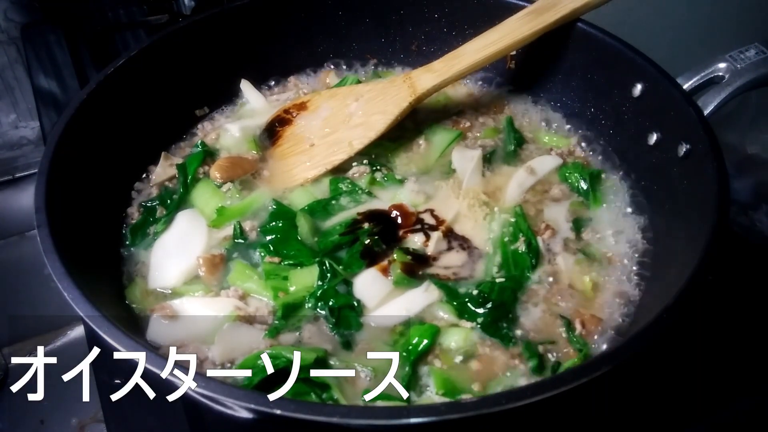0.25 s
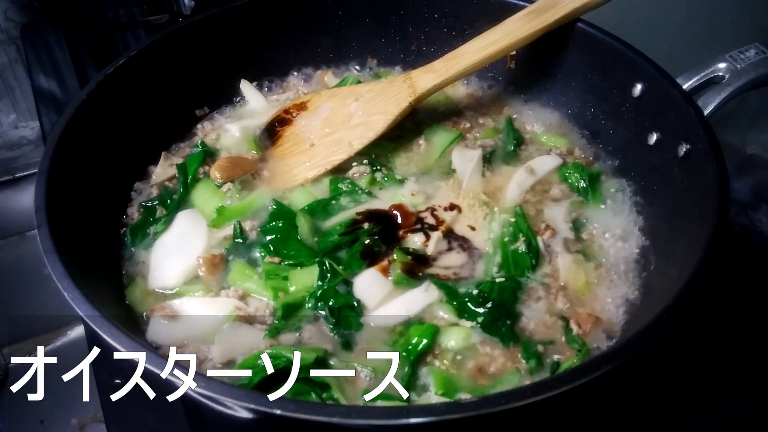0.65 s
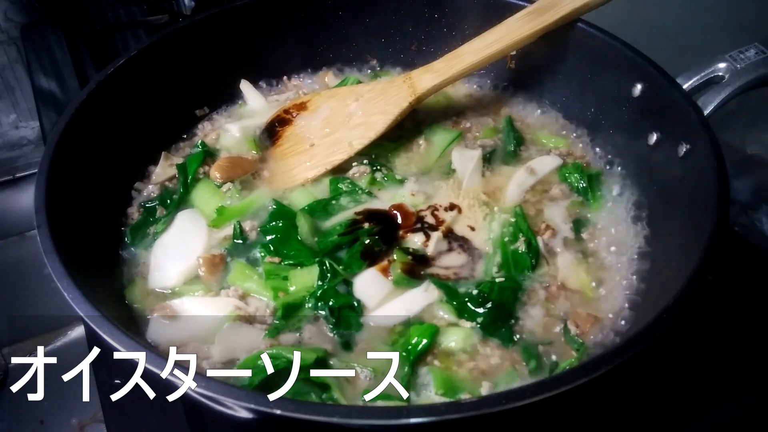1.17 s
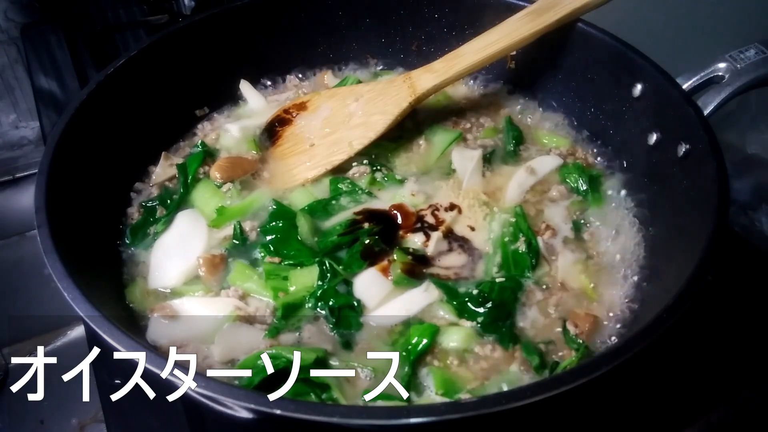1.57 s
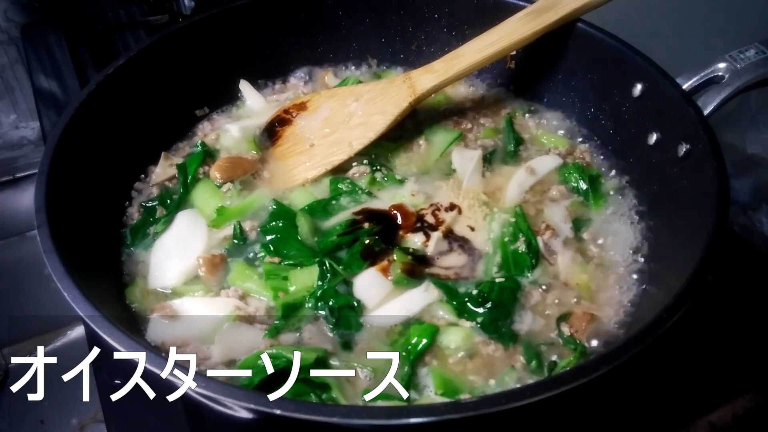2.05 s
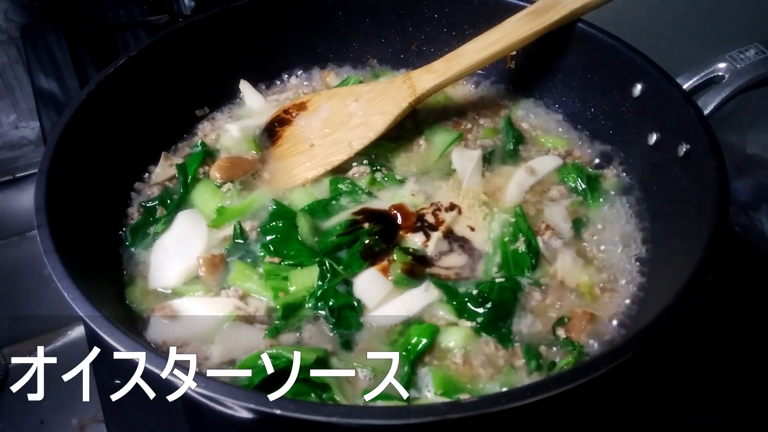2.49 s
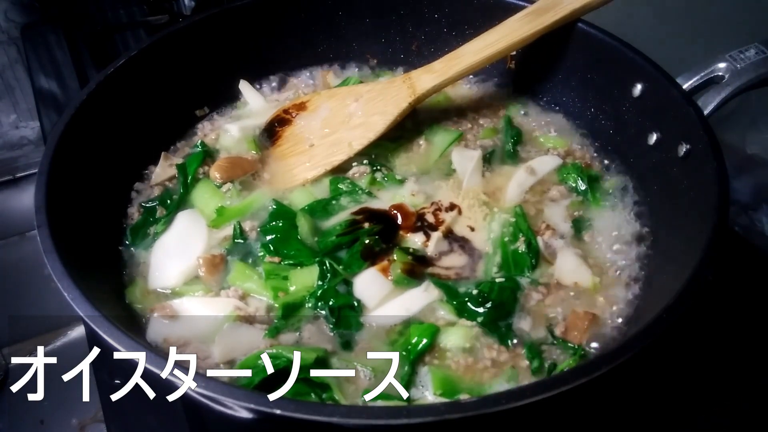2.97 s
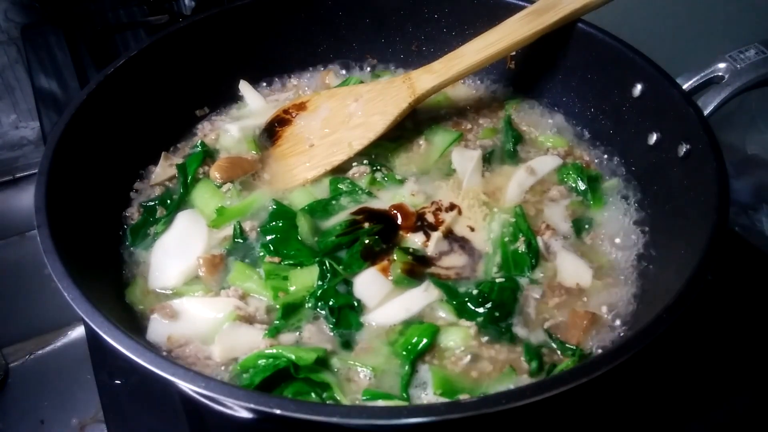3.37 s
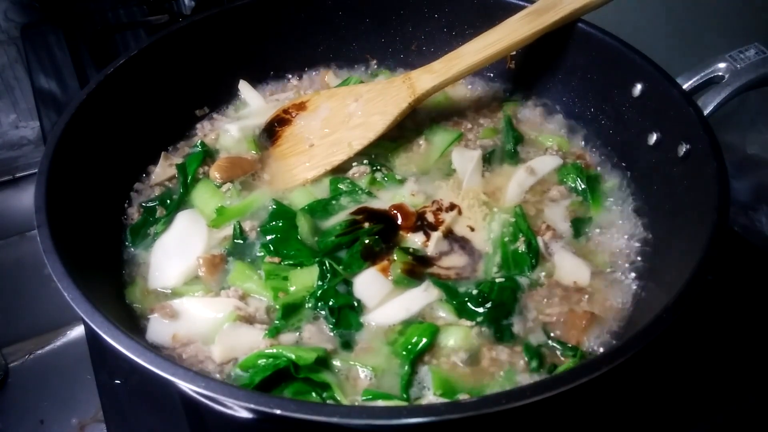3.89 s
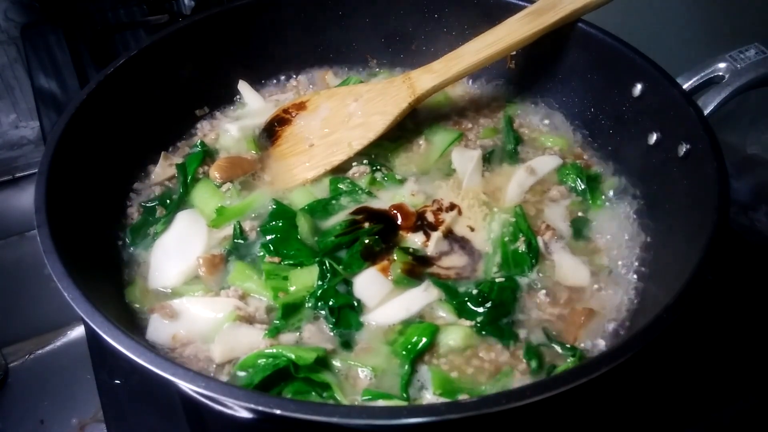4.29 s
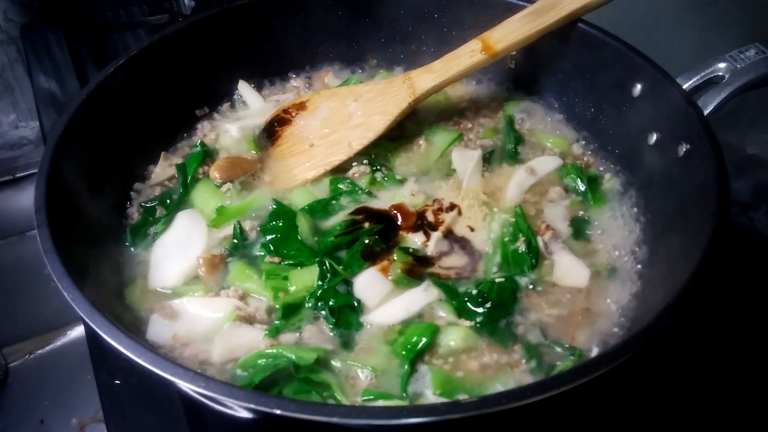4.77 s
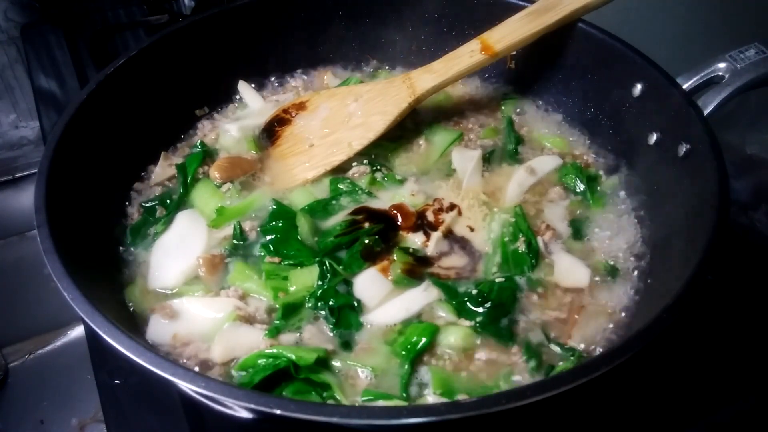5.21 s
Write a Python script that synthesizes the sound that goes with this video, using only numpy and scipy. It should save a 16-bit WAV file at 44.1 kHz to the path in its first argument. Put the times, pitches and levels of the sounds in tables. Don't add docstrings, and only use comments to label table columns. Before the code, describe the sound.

Broth sizzles and bubbles softly in a pan close by while a wooden drawer is knocked, slid and shut, with sharp clicks on a counter.

```python
import sys
import numpy as np
from scipy import signal
from scipy.fft import rfft, irfft, next_fast_len
from scipy.io import wavfile
from scipy.ndimage import uniform_filter1d, minimum_filter1d, map_coordinates

SR = 44100
rng = np.random.default_rng(int(sys.argv[2]) if len(sys.argv) > 2 else 0)


def field_ratio(decibels):
    return 10 ** (np.asarray(decibels, dtype=float) / 20)


def unload_wav(signal):
    wavfile.write(
        sys.argv[1],
        SR,
        np.round(np.clip(np.atleast_2d(signal).T, -1, 1) * 32767).astype(np.int16),
    )


N = 239992


def unit(x):
    return x / np.sqrt(np.mean(x ** 2) + 1e-20)


def seconds(length):
    return np.arange(length) / SR


def along(points, hz):
    f, v = np.transpose(points)
    return np.interp(np.log(hz + 1), np.log(f + 1), v)


def curve(rows):
    s, level_db = np.transpose(rows)
    return np.interp(seconds(N), s, level_db)


def wobble(rate):
    knots = rng.standard_normal(int(N * rate / SR) + 4)
    return map_coordinates(knots, [np.arange(N) * rate / SR])


def filtered(x, response):
    m = next_fast_len(len(x) + 8192)
    spectrum = rfft(x, m) * response(np.fft.rfftfreq(m, 1 / SR))
    return unit(irfft(spectrum, m)[:len(x)])


def resonances(modes):
    def response(f):
        total = 0
        for k, (hz, width, db) in enumerate(modes):
            total = total + (-1) ** k * field_ratio(db) * 1j * f * width / (hz * hz - f * f + 1j * f * width)
        return total
    return response


def patchy(depth_db, size):
    z = signal.stft(rng.standard_normal(N + 512), nperseg=512)[2]
    field = uniform_filter1d(rng.standard_normal(z.shape), size, 0)
    field = uniform_filter1d(field, 8, 1)
    patched = z * field_ratio(depth_db * np.clip(unit(field), -2, 2))
    return signal.istft(patched, nperseg=512)[1][:N]


def steadied(x):
    return unit(x / (np.abs(signal.hilbert(x)) + 0.16) ** .5)


def add(out, s, x):
    part = out[round(s * SR):][:len(x)]
    part += x[:len(part)]


def tones(lines, drift):
    t, out = seconds(N), np.zeros(N)
    for hz, db in lines:
        level = field_ratio(db + 3.5 + 1.4 * wobble(9))
        out += level * np.sin(2 * np.pi * hz * t + drift * wobble(4.45))
    return out


# start_s, level_db
DRAUGHT = [(0.0, -43.5), (.13, -43.5), (.4, -45.5), (.7, -45), (.95, -45.5), (1.21, -43.5), (1.54, -50.5),
           (1.86, -50.5), (2.4, -44), (2.6, -52.5), (3.0, -49), (3.45, -48), (3.75, -50), (4.1, -48),
           (4.3, -50.5), (4.65, -49), (5.15, -52.5), (5.44, -48.5)]


def flame(db, grows):
    return db + grows * (curve(DRAUGHT) + 50)


# pitch_hz, level_db
MOTOR_NOTES = [(64, 2.5), (131, -13)]
# start_s, level_db
MOTOR_LOAD = [(0.0, -41.5), (.14, -58), (0.39, -41.5), (0.58, -40), (.85, -48), (1.14, -44), (1.45, -54),
              (1.9, -70), (3.04, -51), (3.56, -52.5), (3.77, -45), (4.15, -48), (4.55, -55.5), (4.8, -48),
              (4.91, -38), (5.05, -36.5), (5.28, -39.5), (5.34, -45)]


def far_motor():
    return field_ratio(curve(MOTOR_LOAD) - 2.0) * tones(MOTOR_NOTES, drift=1.3)


# pitch_hz, level_db
HUM_NOTES = [(99, 4.5), (195, -6)]
# pitch_hz, level_db
WHINE_NOTES = [(486.3, -63), (195, -62)]
# start_s, length_s, level_db
HUM_SPELLS = [
    (0, 0.14, -44.5),
    (0.882, 0.35, -44.5),
    (2.076, 0.33, -44),
    (2.84, 0.11, -50),
    (3.207, 0.18, -50.5),
    (3.5, .12, -50),
    (4.1, 0.22, -54),
    (4.615, 0.06, -48.5),
    (4.9, 0.45, -50),
]
HUM_FADE_DB_PER_S, HUM_IDLE_DB = 82, -55.5


def appliances():
    t = seconds(N)
    hum_db = np.full(N, HUM_IDLE_DB)
    for s, length, db in HUM_SPELLS:
        outside_s = np.maximum(np.maximum(s - t, t - s - length), 0)
        hum_db = np.maximum(hum_db, db - HUM_FADE_DB_PER_S * outside_s)
    return field_ratio(hum_db - 4.5) * tones(HUM_NOTES, drift=0.97) + tones(WHINE_NOTES, drift=0.38)


# pitch_hz, level_db
RUMBLE_COLOUR = [(12, -39), (20, 4), (43, -3), (70, -1.5), (172, -6.5), (278, -4.5), (445, -25),
                 (492, -14.5), (535, -42), (600, -9.5), (780, -37), (1320, -120)]
# pitch_hz, width_hz, level_db
ROOM_MODES = [(47, 7.9, -0.5), (139, 22, 1.5), (264.5, 45, -1), (278, 6.8, -5.5), (346.8, 10, 7.5),
              (393.4, 26.5, 11)]


def rumble():
    def room(f):
        return field_ratio(along(RUMBLE_COLOUR, f)) * (1 + 2.36 * np.abs(resonances(ROOM_MODES)(f)))
    level = field_ratio(flame(-48, grows=1.04) + 1.5 * wobble(10))
    return level * filtered(patchy(1.8, size=2), room)


# start_s, level_db, hold_s (ringing on), boom_db, rattle_db
DRAWER_BLOWS = [(1.9713, -10, 0.0084, -1.5, -8.5), (1.997, -21, 0.036, 4, -6),
                (2.098, -19, 0.03, -3, -10.5), (2.15, -21.5, 0.13, -2.5, -15), (2.33, -52.5, 0.11, -9, -4),
                (2.489, -41.5, 0.015, -12, -8.5), (2.759, -17.5, 0.0089, -8, -9),
                (2.797, -28.5, 0.033, 0, -14.5), (3.04, -42, 0.0044, -3, -5),
                (3.221, -40, 0.015, -11, -5.5), (3.296, -37, 0.016, -23, -33),
                (4.055, -38, 0.024, -9.5, -26), (4.6, -49, 0.018, -11, -5)]
# pitch_hz, width_hz, level_db
FRONT_PANEL = [(179, 29, -8), (235.6, 68, -3), (318.4, 42, 1.5), (387, 87, -6.5), (466, 85, -7),
               (560, 67, -16)]
# pitch_hz, width_hz, level_db
CABINET = [(53, 23, -4.5), (93, 14, -8), (142, 7.5, 0.5)]
# pitch_hz, width_hz, level_db
RUNNERS = [(644, 74, 8.5), (940, 210, 6), (1174, 330, 2), (1500, 120, 1), (1890, 175, -6),
           (2900, 2700, -20)]
WOOD_T60_S, T60_PER_HOLD, LONGEST_T60_S = 0.12, 9.7, 0.22


def drawer():
    out, t = np.zeros(N), seconds(SR // 2)

    def panel(f):
        return resonances(FRONT_PANEL)(f) / (1 + 1j * f / 600) ** 2

    def cabinet(f):
        return resonances(CABINET)(f) / (1 + 1j * f / 250) ** 2

    for s, db, hold, boom_db, rattle_db in DRAWER_BLOWS:
        t60 = min(WOOD_T60_S + T60_PER_HOLD * hold, LONGEST_T60_S)
        fall_db = -60 * np.maximum(t - hold, 0) / t60
        shake = rng.standard_normal((3, len(t)))
        wood = steadied(filtered(shake[0], panel))
        wood += field_ratio(boom_db) * filtered(shake[1], cabinet)
        wood += field_ratio(rattle_db + 0.5 * fall_db) * filtered(shake[2], resonances(RUNNERS))
        add(out, s, field_ratio(db + fall_db) * (1 - np.exp(-t / 0.00062)) * wood)
    return out


# start_s, peak_db, first_hz, last_hz, length_s
SLACKENING = [
    (1.972, -9, 351, 214, 0.042),
    (2.761, -12.5, 482, 130, 0.017),
    (2.773, -17, 320, 290, 0.0243),
]
# start_s, peak_db, first_hz, last_hz, length_s
CHOKED_GLIDES = [(2.7635, -9.5, 57, 132, .05), (3.333, -33, 250, 215, .025), (2.102, -12.5, 385, 317, 0.035),
                 (2.15, -13, 326, 301, .034), (2.186, -13.5, 295, 320, 0.039), (2.265, -16.5, 334, 317, 0.041),
                 (2.012, -18, 254, 213, 0.017), (2.03, -15.5, 175, 120, .025), (2.05, -14.5, 62, 75, 0.0253),
                 (2.072, -16, 110, 150, .016), (2.238, -19, 418, 288, .025), (4.056, -31.5, 330, 270, 0.019),
                 (4.083, -33.5, 260, 240, 0.021)]


def gliding_panels():
    out, t = np.zeros(N), seconds(SR // 10)
    glides = [(*row, 5.5) for row in SLACKENING] + [(*row, 2) for row in CHOKED_GLIDES]
    for s, db, first_hz, last_hz, length, fade_db in glides:
        hz = first_hz * (last_hz / first_hz) ** np.minimum(t / length, 1)
        shape = field_ratio(db - fade_db * t / length) * (1 - np.exp(-t / 0.00097))
        shape *= np.exp(-np.maximum(t - length, 0) / 0.0037)
        add(out, s, shape * np.sin(2 * np.pi * np.cumsum(hz) / SR))
    return out


# start_s, peak_db
ROLLER_TICKS = [(2.097, -22.5), (2.1143, -20), (2.1183, -22), (2.1513, -17), (2.1745, -23), (2.193, -28),
                (2.252, -33)]
# start_s, peak_db, pitch_hz, held_cycles
RINGING_KNOCKS = [(1.2908, -19, 640, 0.7), (1.2893, -33.5, 258, 1.8), (1.2915, -29, 2340, 3.4),
                  (4.13, -44, 2260, 10), (3.968, -43, 2450, 14), (3.987, -45.5, 1720, 13),
                  (1.9705, -19.5, 1880, 6.7), (1.99, -19, 300, 3.7), (1.988, -14.5, 215, 5.3),
                  (2.103, -24, 483, 7.4), (2.165, -25, 459, 15.6), (2.02, -22, 473, 7.2),
                  (1.995, -22, 400, 5), (2.8, -24, 445, 3), (2.0, -22, 940, 3), (2.758, -25.5, 964, 3.6),
                  (2.015, -22, 107.4, 1.5), (2.21, -30, 1030, 6), (2.245, -31, 700, 13.8),
                  (2.29, -35, 930, 6), (2.08, -30, 700, 6.8), (2.115, -28, 815, 6), (2.768, -24, 190, 2),
                  (2.757, -21, 300, 2), (2.882, -34, 230, 1.2), (1.298, -32, 650, 3), (3.583, -33, 1750, 8),
                  (3.588, -31, 750, 5), (2.942, -30.5, 150, .8), (4.776, -34, 123, .9),
                  (2.862, -22, 145, 0.88), (3.5215, -29, 910, 1.9), (3.5525, -17, 850, 0.85),
                  (3.556, -10.5, 900, .8), (3.568, -25, 870, 0.99)]
# start_s, peak_db, pitch_hz, held_cycles
CABINET_SWINGS = [(2.028, -21, 46, 1.6), (2.114, -27, 66, 3.1), (2.134, -21, 140.5, 3.5),
                  (2.221, -22, 91.4, 5.6), (2.31, -30, 319.7, 7.9), (2.82, -24, 110, 1.6),
                  (2.836, -26, 206, 2.7), (2.868, -35, 305, 6.6), (2.901, -27, 155, 1.3),
                  (2.158, -17, 182, 7.4), (2.14, -15, 232.5, 3.5)]


def struck_bodies():
    out, t = np.zeros(N), seconds(SR // 3)
    bodies = [(*row, 5.9) for row in RINGING_KNOCKS] + [(*row, 4.6) for row in CABINET_SWINGS]
    bodies += [(s, db - 13.5, 1890, 6.5, 8) for s, db in ROLLER_TICKS]
    for s, db, hz, cycles, ring in bodies:
        hold = cycles / hz
        swing = field_ratio(db - 60 * np.maximum(t - hold, 0) / (ring * hold)) * (1 - np.exp(-t * hz / 0.072))
        add(out, s, swing * np.sin(2 * np.pi * hz * t))
    return out


# start_s, level_db,
# pitch_hz, length_s
BRUSHES = [(1.944, -52, 2400, .022), (2.0, -46, 7850, 0.092), (1.999, -41.5, 1280, 0.083),
           (2.033, -44.5, 10500, 0.079), (2.485, -57, 3330, .035), (3.114, -51.5, 3230, .04),
           (3.114, -66, 4670, 0.036), (3.212, -58, 3320, .05), (3.575, -46, 1130, 0.067),
           (3.966, -46.5, 2500, .022), (3.969, -53, 4940, 0.04), (3.979, -49.5, 3280, .03),
           (3.964, -49.5, 950, 0.035), (3.965, -52.5, 1680, .03), (4.03, -57, 3300, .05),
           (4.06, -58, 2130, .1), (4.14, -59, 3300, .02), (4.125, -56, 2350, .02), (4.05, -62, 5000, .1),
           (4.058, -51, 800, 0.097)]


def scuffs():
    out, t = np.zeros(N), seconds(SR // 5)
    for s, db, hz, length in BRUSHES:
        band = resonances([(hz, .35 * hz, 0)])
        rub = filtered(rng.standard_normal(len(t)), lambda f: band(f) ** 2)
        shape = field_ratio(db - 60 * np.maximum(t - length, 0) / 0.14) * (1 - np.exp(-t / 0.0014))
        add(out, s, shape * rub)
    return out


# pitch_hz, t60_s
KITCHEN_T60 = [(300, 0.87), (1000, 0.13), (4000, 0.29), (9000, 0.2), (15000, 0.14)]


def echo(response, length):
    hz, t, z = signal.stft(rng.standard_normal(SR // 2), SR, nperseg=256)
    fade = field_ratio(-60 * t / along(KITCHEN_T60, hz)[:, None])
    fade = fade * (1 - np.exp(-t / (0.0025 + 0.14 * length)))
    tail = filtered(signal.istft(z * fade, SR, nperseg=256)[1], response)
    return tail / np.linalg.norm(tail)


# start_s, peak_db, t60_s, knock_hz, knock_db
COUNTER_CLICKS = [(1.2346, -30.5, 0.023, 9000, 0), (1.245, -29, 0.014, 3580, -0.5),
                  (1.255, -39, 0.012, 3000, -25), (1.2907, -49, 0.032, 694, 23.5),
                  (1.2912, -5, 0.0045, 2620, -20), (2.001, -21.5, 0.052, 2500, 0.5),
                  (2.7552, -15, 0.005, 10200, -5), (3.412, -25.5, 0.052, 5230, 0.5),
                  (3.4151, -20.5, 0.03, 860, -5.5), (3.4185, -18.5, 0.018, 7700, -5),
                  (3.424, -25, 0.015, 3000, -6), (3.458, -32, 0.038, 5000, 4.5),
                  (3.4605, -17, 0.011, 800, -9), (3.522, -49, 0.013, 1100, 23),
                  (3.5523, -7, 0.0051, 6260, -0.5), (3.556, -18, 0.0071, 9500, -7),
                  (3.563, -19, 0.008, 6000, -1), (3.569, -24, 0.008, 6500, -3),
                  (3.5532, -24, 0.02, 2720, 4), (3.5547, -33.5, 0.046, 900, 16.5),
                  (3.995, -23, 0.0096, 1700, -24)]
# start_s, peak_db, t60_s, knock_hz, knock_db
CABINET_CATCHES = [
    (0.566, -50.5, 0.045, 1600, 13.5),
    (1.9699, -6.5, 0.016, 1890, -16),
    (2.7598, -15, 0.008, 1280, -11),
    (3.105, -47, 0.085, 1740, 2),
    (3.115, -30, 0.13, 800, -8),
    (1.496, -56, 0.031, 1050, 20),
    (1.818, -58, 0.04, 1150, 20),
    (2.026, -20.5, 0.038, 2600, -3.5),
    (4.13, -64, 0.04, 2400, 22),
]
# pitch_hz, width_hz, level_db
MIC_PORT = [(2500, 1200, -9.5), (5520, 1030, -9.5), (7370, 640, 2.5), (10360, 1070, 1.5), (15100, 760, -9)]


def clicks():
    out, t = np.zeros(N), seconds(SR // 5)
    ticks = [(s, db, 0.0087, 2620, -6.5) for s, db in ROLLER_TICKS]
    contacts = [(*row, -1) for row in COUNTER_CLICKS]
    contacts += [(*row, -7) for row in CABINET_CATCHES + ticks]
    crack = resonances(MIC_PORT)
    for s, db, t60, hz, knock_db, room_db in contacts:
        body = resonances([(hz, hz / 1.24, 0)])
        knock = lambda f: body(f) ** 2
        shape = field_ratio(-60 * t / t60) * (1 - np.exp(-t / (0.092 * t60)))
        grit = shape * rng.standard_normal((2, len(t)))
        size = field_ratio(db) * np.sqrt(np.mean(shape ** 2))
        direct = filtered(grit[0], crack) + field_ratio(knock_db) * filtered(grit[1], knock)
        answer = echo(crack, t60) + field_ratio(knock_db) * echo(knock, t60)
        add(out, s, size * direct)
        add(out, s, size * field_ratio(room_db) * np.sqrt(len(t)) * answer)
    return out


# pitch_hz, level_db
BROTH_COLOUR = [(240, -11), (400, -5), (521, -4), (922, -4.5), (1500, -12), (1720, -7.5), (1990, -11),
                (2520, -13), (5000, -27.5), (6500, -50), (11000, -120)]
# pitch_hz, width_hz, level_db
PAN_MODES = [(800, 12, -1.5), (926, 15, 4.5), (1216, 31, 0.5), (1600, 9.2, 8.5), (1757, 28, -1),
             (2500, 130, -1)]


def bubbles(count=2500):
    when = rng.random(count)
    hz = np.clip(1100 * np.exp(.6 * rng.standard_normal(count)), 300, 5000)[:, None]
    size = field_ratio(2.0 * rng.standard_normal(count))[:, None]
    cycles = seconds(900) * hz
    life = cycles / 6.5
    shapes = size * life * np.exp(-2.5 * life) * np.sin(2 * np.pi * cycles * (1 + 0.057 * life))
    index = (when * N).astype(int)[:, None] + np.arange(900)
    pops = np.bincount(index.ravel(), shapes.ravel(), N + 900)[:N]

    def pan(f):
        return field_ratio(along(BROTH_COLOUR, f)) * (1 + 0.64 * np.abs(resonances(PAN_MODES)(f)))

    wash = filtered(patchy(2.94, size=4), pan)
    level = field_ratio(flame(-52, grows=0.72) - 0.5 + 0.8 * wobble(12))
    return level * unit(wash + 0.78 * filtered(pops, pan))


# start_s, peak_db, pitch_hz
BIG_BUBBLES = [(0.209, -40, 906), (0.238, -38, 705), (0.349, -35, 800), (0.381, -31, 278),
               (0.574, -38, 1010), (0.619, -34, 926), (0.699, -38, 908), (0.941, -36, 924),
               (0.999, -37, 1780), (2.414, -48, 1020), (2.726, -40, 954), (3.04, -53, 1010),
               (3.12, -38, 824), (3.352, -40, 606), (3.749, -37, 1600), (4.0667, -37, 2000),
               (4.134, -37, 2130), (4.1969, -41, 2090), (4.423, -38.5, 790), (4.475, -34, 870),
               (4.496, -38, 1570), (4.819, -41, 1600), (4.889, -41, 640), (4.968, -36.5, 420),
               (5.098, -34, 252), (5.226, -36.5, 269), (5.307, -37, 960)]


def plops():
    out, t = np.zeros(N), seconds(SR // 12)
    for s, db, hz in BIG_BUBBLES:
        life = t * hz / 9
        shape = field_ratio(db + 1.5) * np.sqrt(life) * np.exp(-1.5 * life)
        add(out, s, shape * np.sin(2 * np.pi * hz * t * (1 + 0.015 * life)))
    return out


# start_s, peak_db
MORE_DROPS = [(0.5437, -25), (1.0191, -33), (1.1107, -30), (1.6092, -33), (1.7674, -36), (2.3082, -36),
              (2.4369, -31), (2.5686, -35), (2.819, -34), (3.2176, -29), (3.8561, -28), (4.3585, -34),
              (4.8444, -28)]


def more_drops():
    out, t = np.zeros(N), seconds(SR // 30)
    for s, db in MORE_DROPS:
        snap = filtered(rng.standard_normal(len(t)), resonances(MIC_PORT))
        add(out, s, field_ratio(db - 10 - 60 * t / .012) * snap)
    return out


# start_s, peak_db, pitch_hz
EARLY_CRACKS = [(0.1376, -33, 7320), (0.3102, -33, 7370), (0.3601, -30, 7340), (0.5162, -31, 7600),
                (0.6873, -32, 10400), (0.7796, -32, 7450), (0.838, -27, 10400), (1.0191, -31, 7690),
                (1.1104, -29, 10600), (1.1588, -32, 9210), (1.1643, -29, 7440), (1.2346, -26, 7430)]
# start_s, peak_db, pitch_hz
MIDWAY_CRACKS = [(1.547, -31, 10200), (1.767, -30, 10200), (1.8368, -33, 7740)]
# start_s, peak_db, pitch_hz
LATE_CRACKS = [(4.3585, -32, 9800), (4.37, -35, 10500), (4.3734, -32, 9720), (4.3864, -36, 10300),
               (4.3944, -35, 9730), (4.4294, -36, 9850), (4.4554, -32, 9240), (4.4664, -32, 10200),
               (4.4974, -35, 10400), (4.5087, -31, 10500), (4.5204, -33, 10400), (4.5774, -37, 10800),
               (4.6019, -34, 7490), (4.6723, -33, 10500), (4.7162, -28, 10600), (4.7734, -33, 10900),
               (4.8184, -34, 10200), (4.8444, -32, 8780), (4.8653, -30, 7560), (5.1382, -37, 10800)]


def steam_cracks():
    out, t = np.zeros(N), seconds(SR // 200)
    for s, db, hz in EARLY_CRACKS + MIDWAY_CRACKS + LATE_CRACKS:
        add(out, s, field_ratio(db + 1.5 - 60 * t * hz / 14) * np.sin(2 * np.pi * hz * t))
    return out


# start_s, level_db
RIM_HEAT = [(0.0, -51.5), (0.13, -47), (0.5, -46), (1.1, -45), (1.35, -42), (1.55, -45.5), (1.91, -45.5),
            (2.27, -42.5), (2.4, -47), (2.5, -44.5), (2.7, -46), (3.4, -43.5), (3.72, -41.5), (3.9, -47.5),
            (4.13, -45), (4.58, -50.5), (4.88, -47.5), (5.44, -53)]
# start_s, peak_db
SPITTING_DROPS = [(0.311, -34), (0.361, -32), (0.52, -33), (0.6873, -33), (0.78, -27), (0.839, -30),
                  (1.1643, -27), (1.5469, -33), (2.463, -27), (2.489, -26), (3.726, -30), (3.774, -30),
                  (3.832, -31), (4.1308, -31), (4.371, -30), (4.51, -32), (4.716, -33), (4.8183, -40),
                  (4.866, -28), (4.89, -30), (4.903, -25)]
# pitch_hz, level_db
SIZZLE_COLOUR = [(1470, -27), (2500, -18), (3020, -13), (3680, -20.5), (5250, -13), (5730, -10.5),
                 (6450, -8.5), (7550, 4), (8500, -1.5), (10600, 2.5), (12300, -11), (15500, -7),
                 (16100, -39), (16500, -39)]


def sizzle():
    burst_db = 4.5 * np.minimum(rng.exponential(size=N), 3.3)
    bursts = rng.standard_normal(N) * field_ratio(burst_db) * (rng.random(N) < .06)
    flutter = field_ratio(.7 * wobble(9) + .8 * wobble(35) + 1.5 * wobble(180))
    frying = flutter * (.5 * unit(bursts) + patchy(1.57, size=10))
    spray = field_ratio(curve(RIM_HEAT) + 1) * unit(frying)
    t = seconds(1300)
    for s, db in SPITTING_DROPS:
        add(spray, s, field_ratio(db - 6.0 - 60 * t / 0.01) * rng.standard_normal(len(t)))
    return filtered(spray, lambda hz: field_ratio(along(SIZZLE_COLOUR, hz))) * np.std(spray)


def scene():
    room = far_motor() + appliances() + rumble()
    nearby = drawer() + gliding_panels() + struck_bodies() + scuffs() + clicks()
    pan = bubbles() + plops() + more_drops() + steam_cracks() + sizzle()
    return (room + nearby + pan)[None]


def band_limit(x):
    return signal.sosfilt(signal.butter(12, 16820, fs=SR, output="sos"), x)


def record(dry):
    sensed = uniform_filter1d(dry, size=15, axis=1)
    need = np.minimum(1, .26 / (np.abs(sensed) + 1e-9))
    gain = uniform_filter1d(minimum_filter1d(need, size=265, axis=1), size=265, axis=1)
    limited = dry * gain ** .9
    limited = limited / (1 + np.abs(limited / .42) ** 6) ** (1 / 6)
    low_cut = signal.butter(4, 36, "highpass", fs=SR, output="sos")
    high_cut = signal.cheby2(10, 40, 16900, fs=SR, output="sos")
    band = signal.sosfilt(high_cut, signal.sosfilt(low_cut, limited))
    return band_limit(band)


dry = scene()
out = record(dry)
unload_wav(out)
```